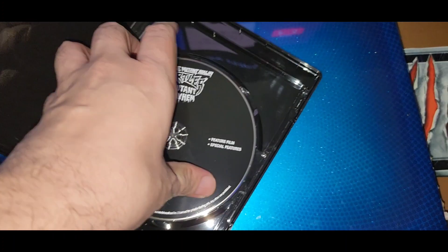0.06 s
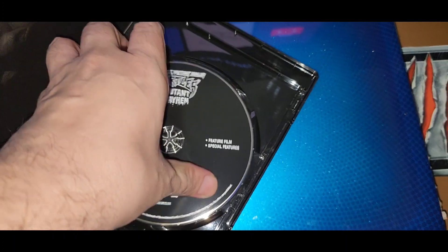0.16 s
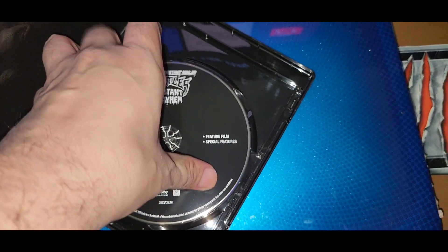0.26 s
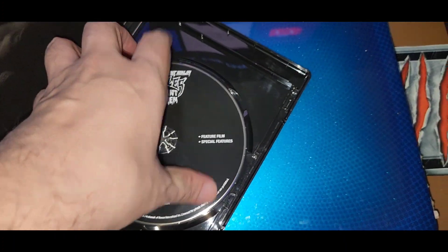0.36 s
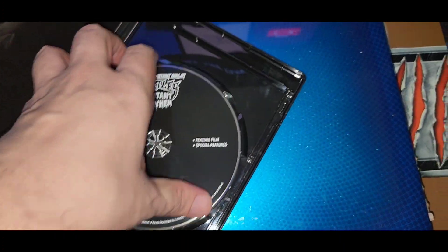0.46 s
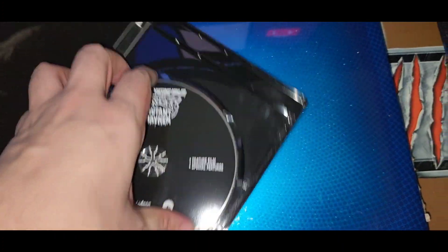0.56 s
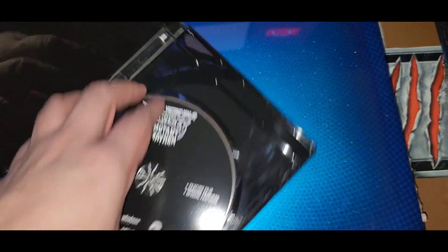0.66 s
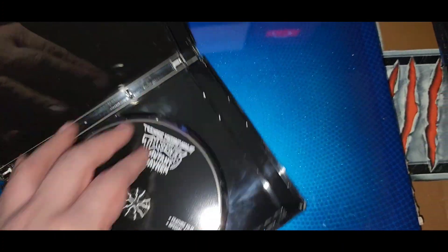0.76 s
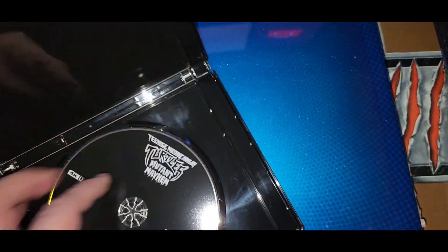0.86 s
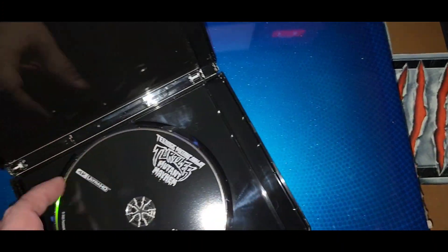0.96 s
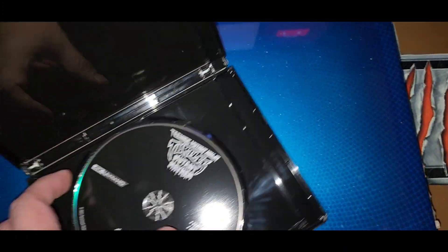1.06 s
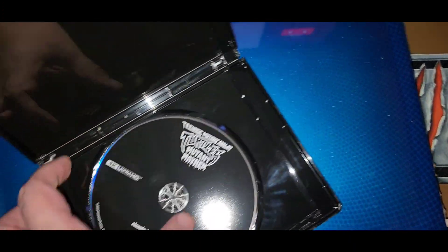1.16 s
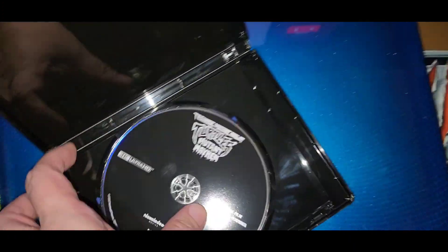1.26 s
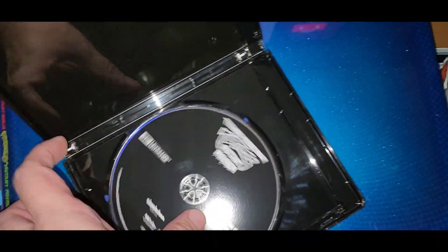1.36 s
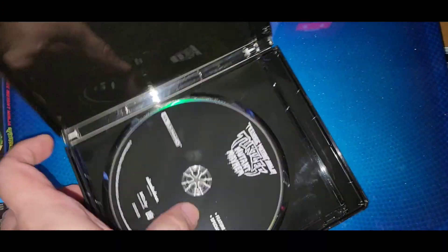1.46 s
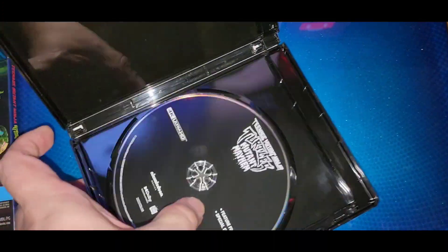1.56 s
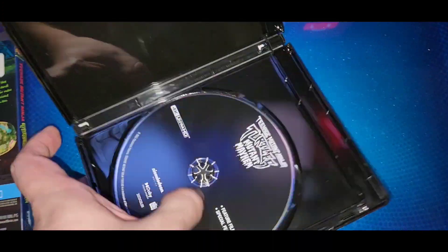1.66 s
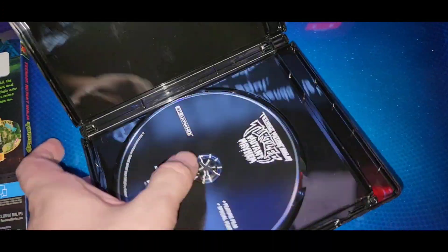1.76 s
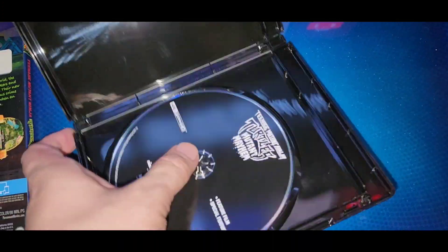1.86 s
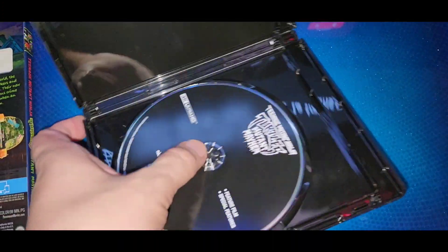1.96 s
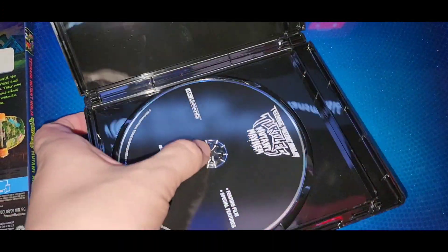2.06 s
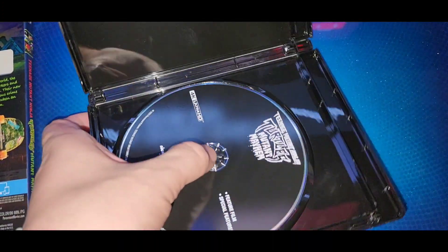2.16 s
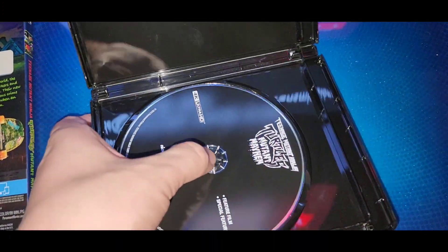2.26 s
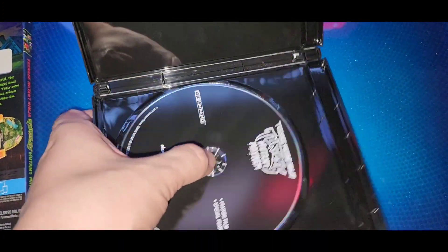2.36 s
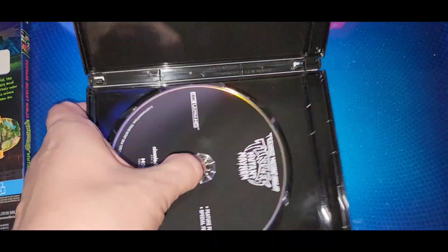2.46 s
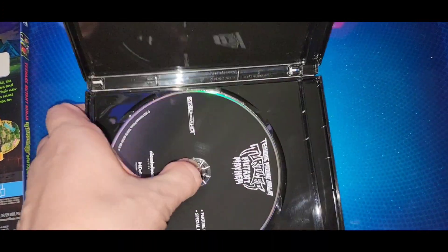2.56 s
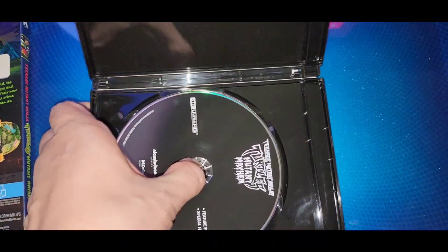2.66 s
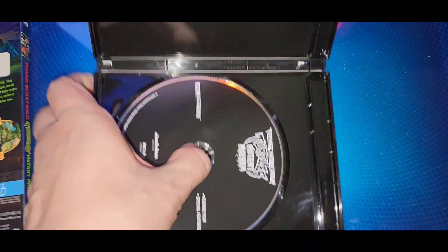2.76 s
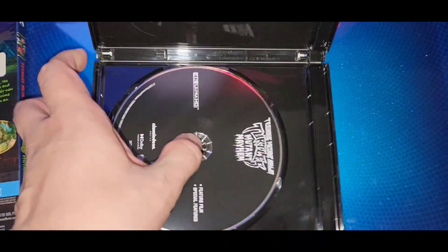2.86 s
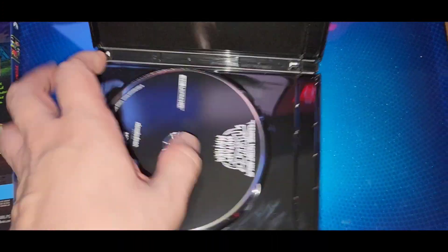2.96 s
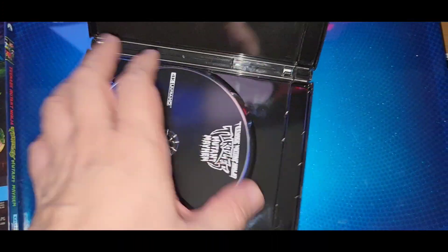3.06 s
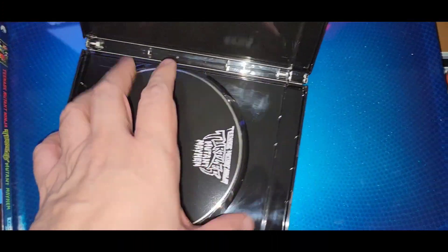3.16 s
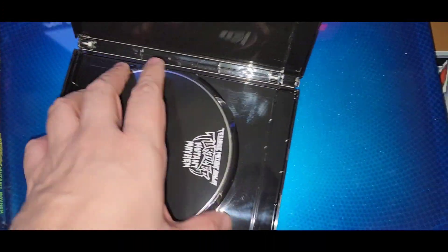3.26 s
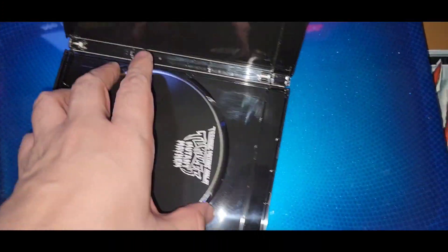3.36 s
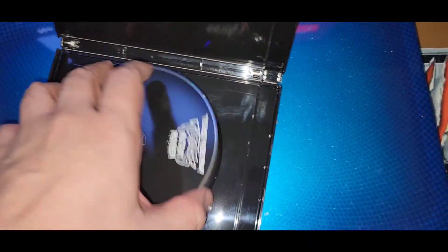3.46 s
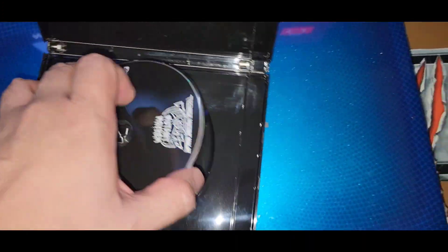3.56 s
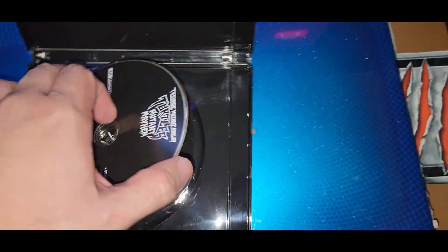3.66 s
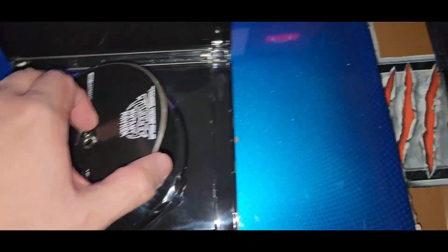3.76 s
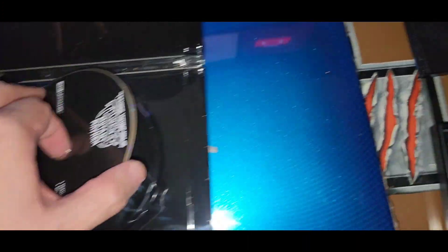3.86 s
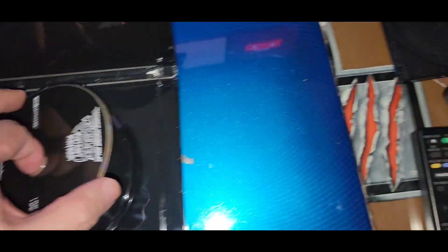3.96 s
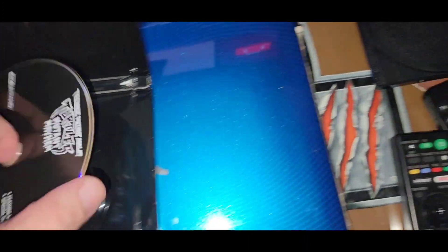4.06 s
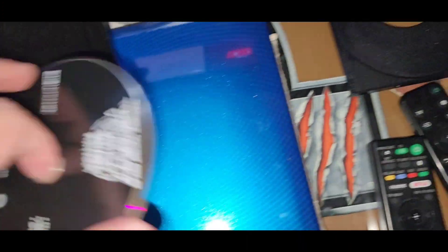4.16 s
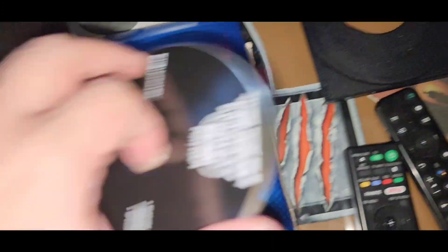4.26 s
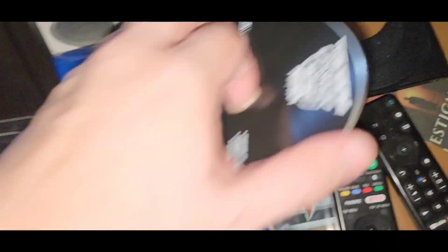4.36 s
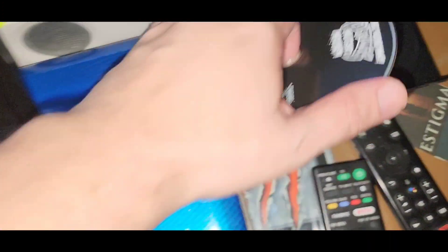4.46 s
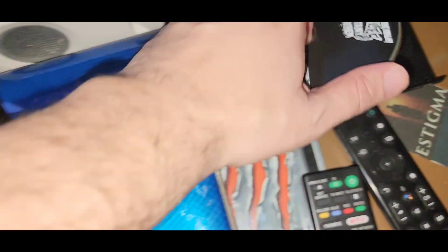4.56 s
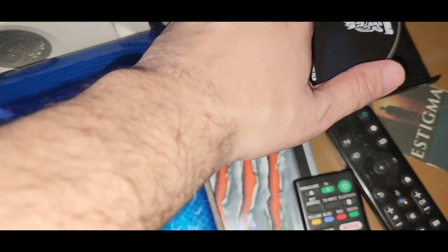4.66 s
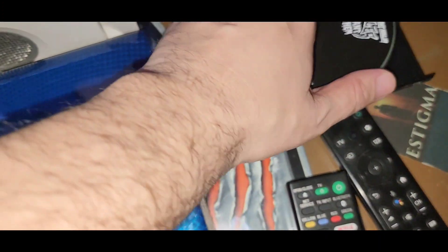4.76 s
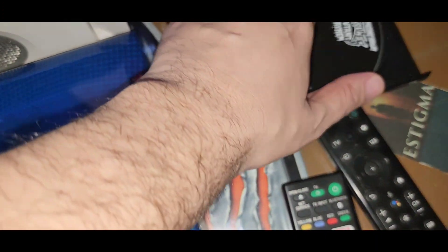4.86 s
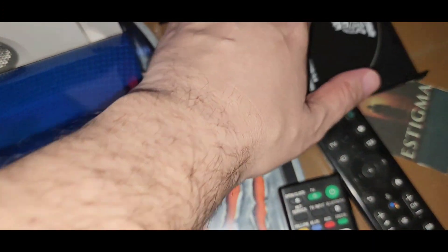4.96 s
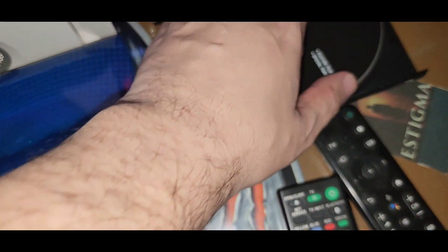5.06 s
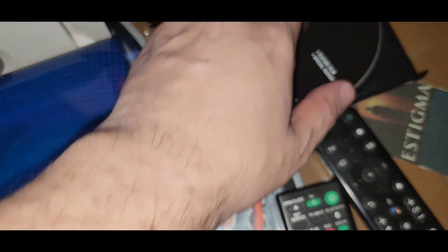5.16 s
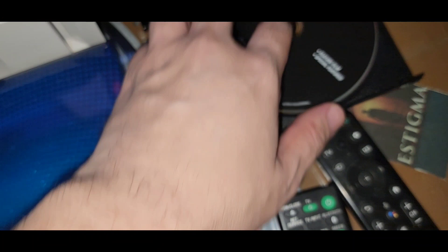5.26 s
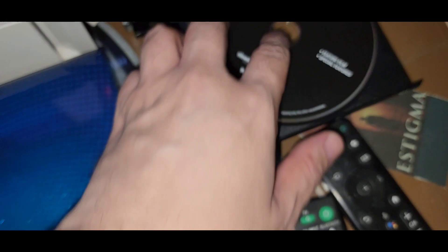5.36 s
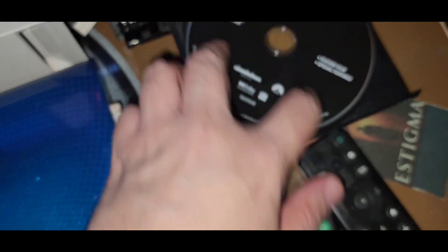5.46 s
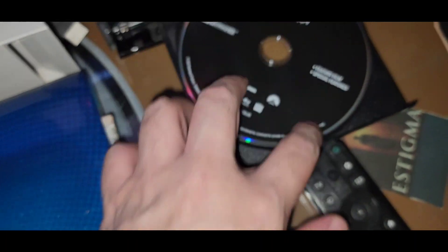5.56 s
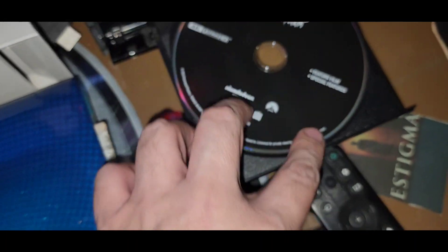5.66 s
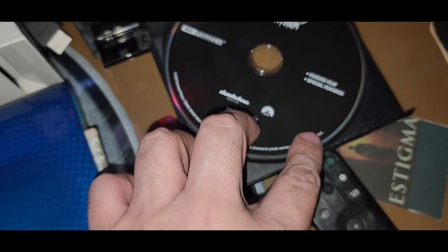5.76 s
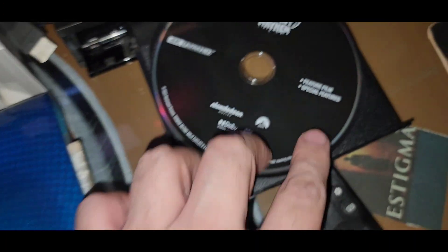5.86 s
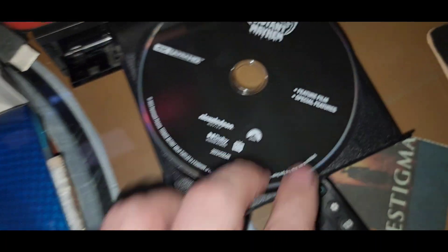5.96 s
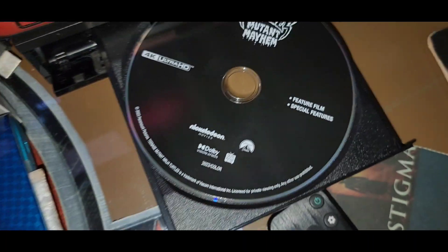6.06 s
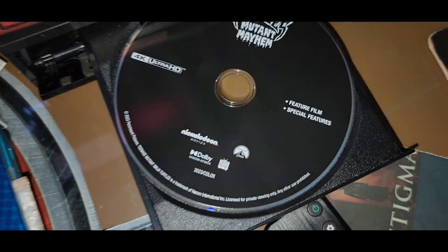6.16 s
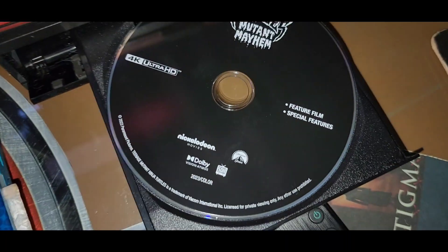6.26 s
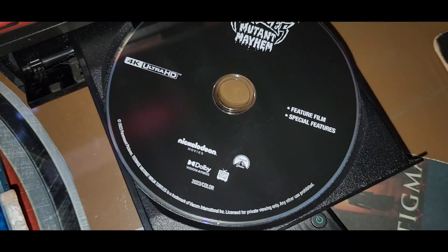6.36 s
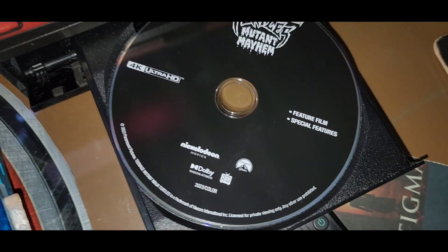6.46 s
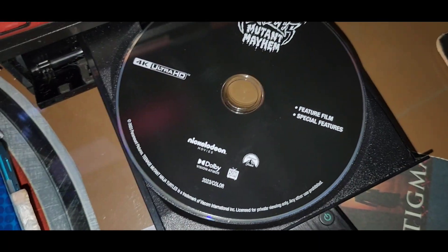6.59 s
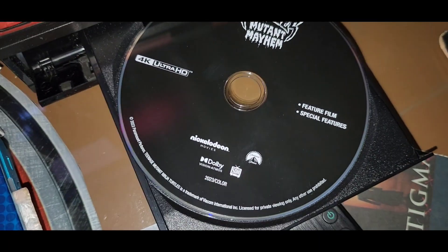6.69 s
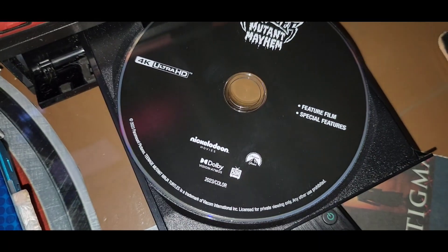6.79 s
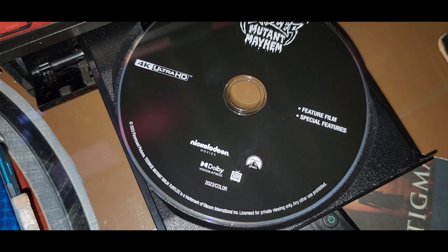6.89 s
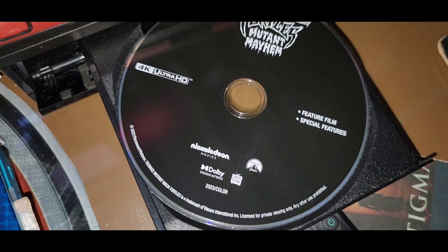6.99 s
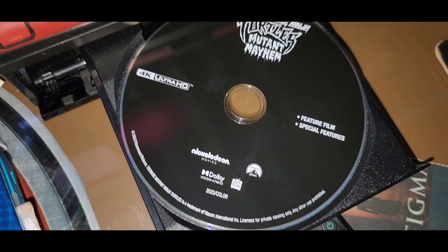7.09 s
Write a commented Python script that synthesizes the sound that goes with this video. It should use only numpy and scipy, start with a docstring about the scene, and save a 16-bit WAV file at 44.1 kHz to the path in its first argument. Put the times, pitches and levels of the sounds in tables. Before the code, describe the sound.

Fingers rub and tick on a thin plastic case, the hub pops loudly, and the disc skids and drops into a tray.

```python
"""A small, quiet room with a low rumble: close to a stereo microphone, a hand works a disc off the hub of its case.
Plastic contacts are cracks, flexing noise and ringing plates; fingers rub as noisy slips and catches; the case bumps
the desk as decaying low sines under a dull knock. The hub lets go with a loud snap. The disc is then laid in the
open tray of a player: it clatters, skids in two layers of noise and drops into its seat while the tray wobbles in
two low modes. A few faint ticks ring out; near the end come a whisk of bright noise and a squeak of one gliding sine."""
import sys
import numpy as np
from scipy import signal
from scipy.fft import rfft, irfft, next_fast_len
from scipy.io import wavfile
from scipy.ndimage import map_coordinates

SR = 44100
rng = np.random.default_rng(int(sys.argv[2]) if len(sys.argv) > 2 else 0)


def master_out(mix):
    """Clip the mix to full scale and print it as 16-bit PCM to the path in sys.argv[1]."""
    frames = np.transpose(np.atleast_2d(mix))
    ceiling = np.clip(frames, -1, 1)
    pcm = np.round(ceiling * 32767).astype(np.int16)
    wavfile.write(sys.argv[1], SR, pcm)


N = 314244


def amp(db):
    """Decibels to gain."""
    return 10 ** (np.asarray(db) / 20)


def unit(x):
    """x at rms 1."""
    return x / np.sqrt(np.mean(x ** 2) + 1e-20)


def along(points, hz):
    """Read a curve of (Hz, value) points on a log frequency axis."""
    f, v = np.transpose(points)
    return np.interp(np.log(hz + 1), np.log(f + 1), v)


def filtered(x, response):
    """x times a response of frequency."""
    n = x.shape[-1]
    m = next_fast_len(n + SR // 8)
    return irfft(rfft(x, m) * response(np.fft.rfftfreq(m, 1 / SR)), m)[..., :n]


def causal(x, gain_db, size=4096):
    """Colour x with a minimum-phase filter, so that nothing sounds before a blow."""
    log_gain = gain_db(np.fft.rfftfreq(size, 1 / SR)) * np.log(10) / 20
    cepstrum = irfft(log_gain)
    # folding the cepstrum onto positive time makes the filter minimum-phase
    cepstrum[1:size // 2] *= 2
    cepstrum[size // 2 + 1:] = 0
    impulse = irfft(np.exp(rfft(cepstrum)))
    return signal.fftconvolve(x, impulse[None], axes=1)[:, :x.shape[1]]


def add(track, s, sound):
    """Mix a sound into the track from time s."""
    part = track[:, max(round(s * SR), 0):][:, :sound.shape[-1]]
    part += sound[..., :part.shape[1]]


def wobble(n, rate):
    """A smooth random curve of n samples, rate knots a second."""
    return map_coordinates(rng.standard_normal(int(n * rate / SR) + 4), [np.arange(n) * rate / SR])


def pair(n, alike, lead_ms, shared_hz=600):
    """White noise at two ports: long waves reach both alike, short ones only partly; the left leads by lead_ms."""
    hz = np.fft.rfftfreq(n, 1 / SR)
    noise = rfft(rng.standard_normal((3, n)))
    own = np.clip(1 - alike, 0, 1) * hz ** 2 / (hz ** 2 + shared_hz ** 2)
    ports = np.sqrt(1 - own) * noise[0] + np.sqrt(own) * noise[1:]
    lead = np.pi * hz * lead_ms / 1000 * np.array([[1], [-1]])
    return irfft(ports * np.exp(1j * lead), n)


def dying(noise, t60, attack=0.0029):
    """Noise with a quick start and an exponential decay, mean energy 1 a channel."""
    t = np.arange(noise.shape[1]) / SR
    burst = noise * 10 ** (-3 * t / t60) * (1 - np.exp(-t / attack))
    return unit(burst) / np.sqrt(len(t))


def plastic(hz, knock_db, snap_db, fizz_db):
    """Spectrum of a contact in dB: thin plastic radiates little bass, and hard edges add treble."""
    knock = [(50, knock_db - 28), (230, knock_db - 6.5), (390, knock_db + 0.6), (650, knock_db - 3.5)]
    middle = [(1250, -0.5), (1650, -6), (2700, 2 + snap_db / 4)]
    snap = [(3900, snap_db + 2.5), (7200, snap_db - 1)]
    fizz = [(8400, fizz_db + 7.5), (11000, fizz_db + 2), (15500, fizz_db - 2)]
    return along(knock + middle + snap + fizz, hz)


def plate(modes, hz):
    """Gain in dB of a plate whose main modes stand out of a bed of dense weak ones."""
    power = sum(amp(db) ** 2 / (1 + (2 * (hz - f) / width) ** 2) for f, width, db in modes)
    return 10 * np.log10(1 + power)


def hump(hz, centre_hz, octaves):
    """Shape of one resonance: 1 at its centre, 0 far from it."""
    return 1 / (1 + np.abs(np.log2((hz + 1) / centre_hz) / octaves) ** 3)


def touch_point(hz, depth_db, spacing_hz=110):
    """Every point of contact favours other modes: a random ripple in dB over frequency."""
    ripple = depth_db * map_coordinates(rng.standard_normal(SR // 20), [hz / spacing_hz], mode="wrap")
    return ripple - 10 * np.log10(np.mean(amp(ripple) ** 2))  # mean power gain 1


def bending(n, lead_ms, spread_s, apart, step_hz=500):
    """A crack of energy about 1: bending waves of each pitch leave the plate at their own moment."""
    hz = np.fft.rfftfreq(n, 1 / SR)
    late, split = (map_coordinates(rng.standard_normal(SR // 20), [hz / step_hz], mode="wrap")
                   for _ in range(2))
    delay_s = spread_s * (np.abs(late) + .25)
    phase = -2 * np.pi * np.cumsum(delay_s) * SR / n
    # the two ports hear different phases, more so in the treble
    port_phase = np.pi * hz * lead_ms / 1000 + apart * split * hz / (hz + 2 * step_hz)
    ports = port_phase * np.array([[1], [-1]])
    return irfft(np.exp(1j * (phase + ports)), n) * (np.arange(n) < n // 4)


PIVOT_HZ = 2500  # soft contacts that ring below this gain knock, those above it lose knock
KNOCK_PER_OCTAVE = 0.48  # dB of knock per octave under the pivot, for each dB of edge lost
CLICK_FIZZ_GROWS = 1.7  # dB of top treble per dB of edge
SOFT_DAMPS = 0.17  # dB of ring lost per dB of edge lost: a soft touch also damps the plate
CHATTER_DB, CHATTER_RATE = 3, 510  # the loose disc buzzes on the plastic: depth, random knots a second


def clicks(rows, modes, lead_ms=.15, spread_s=.0012, flex_t60=0.038, ring_t60=0.092,
           crack_db=-4, flex_db=-5, ring_db=-8.5, peak_db=6, peak_octaves=0.2, ripple_db=4.0,
           softness=0.067, knock_db=-4.5, fizz_db=-6):
    """Contacts: a crack, the quick flexing of the plastic around it, and the ring of the plates."""
    out, n = np.zeros((2, N)), SR // 5
    for s, db, edge_db, main_hz in rows:
        crack = amp(crack_db) * bending(n, lead_ms, spread_s, apart=0.91)
        chatter = amp(CHATTER_DB * wobble(n, CHATTER_RATE))
        flex = amp(flex_db) * dying(pair(n, 0.28, lead_ms) * chatter, flex_t60)
        ringing = filtered(pair(n, 0.068, lead_ms),
                           lambda hz: amp(plate(modes, hz) + touch_point(hz, ripple_db)))
        ring = amp(ring_db + SOFT_DAMPS * edge_db) * dying(ringing, ring_t60)
        # a hard edge fills every band; with softness set, a soft one gathers around its main resonance
        knock = knock_db + KNOCK_PER_OCTAVE * edge_db * np.log2(main_hz / PIVOT_HZ)
        fizz = fizz_db + CLICK_FIZZ_GROWS * edge_db
        main = lambda hz: (peak_db - softness * edge_db) * hump(hz, main_hz, peak_octaves)
        colour = lambda hz: (plastic(hz, knock, edge_db, fizz) + main(hz)
                             + touch_point(hz, ripple_db / 2, spacing_hz=263.0))
        add(out, s, amp(db) * causal(crack + flex + ring, colour))
    return out


def thuds(rows, t60, level_db, overtone, overtone_db, puff_db, attack=0.0037):
    """A soft push swings a whole body in its lowest two modes, with a dull knock around them."""
    out, t = np.zeros((2, N)), np.arange(SR // 3) / SR
    for s, db, hz in rows:
        upper_hz = hz * overtone * rng.uniform(.93, 1.07)
        swing = np.sin(2 * np.pi * hz * t) + amp(overtone_db) * np.sin(2 * np.pi * upper_hz * t)
        knock = unit(filtered(pair(len(t), 0.43, 0), lambda f: (f / hz) ** 2 / (1 + (f / hz) ** 4)))
        fade = 10 ** (-3 * t / t60)
        body = swing + amp(puff_db) * fade * knock  # the knock dies twice as fast as the swing
        add(out, s, amp(db + level_db) * fade * (1 - np.exp(-t / attack)) * body)
    return out


# Spectrum of the still room. Each row: frequency in Hz, relative density in dB per Hz.
ROOM_SPECTRUM = [(15, -28), (30, -6), (56, -5), (95, -13.5), (150, -17.5), (280, -31.5), (600, -37.5),
                 (3500, -44.5), (7700, -49), (9500, -60.5)]


def room_tone(level_db=-62.5, swell_db=3):
    """A randomly swelling rumble that both ports share, under a faint hiss that they mostly do not."""
    shared = [(100, .93), (400, 0.41), (6000, 0.11)]  # (Hz, likeness of the ports)
    turn = lambda hz: np.arccos(np.clip(along(shared, hz), 0, 1)) / 2
    balance = lambda hz: np.array([np.ones_like(hz), np.tan(turn(hz))])
    mid, side = filtered(rng.standard_normal((2, N)),
                         lambda hz: amp(along(ROOM_SPECTRUM, hz)) * balance(hz))
    tone = unit(np.array([mid + side, mid - side]))
    rumble = filtered(tone, lambda hz: 1 / (1 + (hz / 200) ** 4))
    return amp(level_db) * (tone + rumble * (amp(swell_db * wobble(N, 19.0)) - 1))


def room(x, t60=0.23):
    """The walls of a small, furnished room: a noise tail that builds in milliseconds and dies quickly."""
    return signal.fftconvolve(x, dying(rng.standard_normal((2, SR // 2)), t60), axes=1)[:, :N]


def squeak(start_s=7.04, length_s=0.08, top_hz=1730, droop_hz=130, level_db=-75):
    """A faint, thin squeak: one sine whose pitch rises and falls in an arch."""
    out, arch = np.zeros((2, N)), np.sin(np.linspace(0, np.pi, round(length_s * SR)))
    phase = 2 * np.pi * np.cumsum(top_hz - droop_hz * (1 - arch)) / SR
    add(out, start_s, amp(level_db) * np.sqrt(np.abs(arch)) * np.sin(phase))
    return out


def whisk(peak_s=6.745, rise_s=0.055, fall_s=0.028, level_db=-67):
    """A thin, bright hiss of coloured noise swells slowly and fades fast."""
    t = np.arange(N) / SR - peak_s
    bell = np.exp(-(t / np.where(t < 0, rise_s, fall_s)) ** 2 / 2)
    swell = bell * amp(2.7 * wobble(N, 160))
    colour = [(1500, -41), (3500, -5), (5600, 4), (7800, 2.5), (9000, -9), (15500, -10)]  # (Hz, dB)
    hiss = filtered(pair(N, 0.31, 0), lambda hz: amp(along(colour, hz) + touch_point(hz, 2.1)))
    return amp(level_db) * swell * unit(hiss)


# The case bumps on the desk. Each row: start in seconds, relative level in dB, pitch in Hz.
DESK_BUMPS = [(0.32, -48, 113), (1.5, -35.5, 78), (2.633, -41.5, 127.5), (2.989, -42.5, 82.6),
              (3.256, -46.5, 86), (4.168, -60.5, 147), (4.669, -55, 123.5)]


def desk_bumps():
    """The case meets the desk and the whole body swings in two low modes with a dull knock."""
    return thuds(DESK_BUMPS, t60=0.1, level_db=5.5, overtone=1.7, overtone_db=-7.5, puff_db=0.0)


# The tray stiffens as the hand presses down and slackens as it lets go.
# Each row: time in seconds, pitch of the wobble in Hz, level in dB.
TRAY_STIFFNESS = [(4.93, 244.5, -49.5), (5.54, 302.3, -54), (5.67, 237, -51.5), (5.851, 174, -58)]


def tray_wobbles(lag_s=0.0041):
    """Each tray contact and the first seating clack set the tray wobbling on its rails, in two close modes."""
    times, hz, db = np.transpose(TRAY_STIFFNESS)
    rows = [(s + lag_s, np.interp(s, times, db), np.interp(s, times, hz))
            for s, *_ in TRAY_CONTACTS + SEATING_CLACKS[:1]]
    return thuds(rows, t60=0.21, level_db=0, overtone=1.1, overtone_db=-1.5, puff_db=-1.0)


RUB_PEAK_DB, RUB_SINK_OCTAVES = 7.5, 0.33  # height of a rub's resonance, its fall either side of the middle


def sinking(x, n, main_hz, octaves=0.15):
    """A resonance that glides down through main_hz during the first n samples of x."""
    progress = np.clip(2 * np.arange(x.shape[1]) / n - 1, -1, 1)
    centre = lambda stage: main_hz * 2 ** (-stage * RUB_SINK_OCTAVES)
    at = lambda stage: causal(x, lambda hz: RUB_PEAK_DB * hump(hz, centre(stage), octaves))
    # crossfade through three fixed resonances: high, middle, low
    return sum(np.maximum(1 - np.abs(progress - stage), 0) * at(stage) for stage in (-1, 0, 1))


LIFT_S = 4.2  # before this the disc is in the case, afterwards over the tray
RUB_FIZZ_GROWS = 1.6  # dB of top treble per dB of edge
RUB_KNOCK_GROWS = 0.29  # dB of knock per dB of edge lost: a heavy rub moves the whole shell
RUB_RING = 0.22  # share of the plastic's resonance, in dB, left under a sliding finger
# Fingers and plastic sliding. Each row: start in seconds, end in seconds, relative level in dB,
# edge in dB (low for a heavy, dull touch), main resonance in Hz.
SLIDES = [(0.395, 0.457, -45, -3, 2330), (0.542, 0.891, -60, 6, 1400), (0.996, 1.109, -40.5, -8.5, 1380),
          (1.103, 1.531, -58.5, -7.5, 1230), (1.199, 1.278, -45.5, -9, 1150),
          (1.85, 1.963, -47, -10.5, 555), (1.991, 2.086, -46, -4.5, 1390), (2.162, 2.257, -56.5, -9, 2990),
          (2.803, 2.915, -51.5, -10.5, 750), (2.963, 3.09, -52.5, -4.5, 1010),
          (3.242, 3.322, -49.5, -1, 1040), (3.37, 3.401, -43, -3, 1700), (3.57, 3.614, -59.5, 2, 4000),
          (3.845, 3.902, -42, -8, 2010), (3.95, 4.014, -46, -12, 1090), (4.743, 4.837, -47.5, -10.5, 1250),
          (4.949, 5.067, -42.5, -10.5, 1300)]


def rubs(level_db=-4, grain_db=3.0, catch_rate=80, catch_size=0.74, catch_s=0.0017,
         ripple_db=4, knock_db=1.5, fizz_db=-10):
    """Sliding contact: a fine grain of slips, and sudden catches that grow as the touch gets heavier and duller."""
    out = np.zeros((2, N))
    for start, end, db, edge_db, main_hz in SLIDES:
        n = round(max(end - start, .01) * SR)
        hits = rng.random(n) < catch_rate / SR
        catches = hits * (.5 + rng.random(n)) * catch_size * amp(-edge_db)
        released = signal.lfilter([1], [1, -np.exp(-1 / (catch_s * SR))], catches)
        slips = unit(amp(grain_db * wobble(n, 900)) + released)
        uneven = unit(amp(2.5 * wobble(n, 18.6)))  # the hand presses unevenly
        pressure = np.sin(np.linspace(0, np.pi, n)) * uneven
        stroke = np.pad(pressure * slips * pair(n, 0.25, .15), [(0, 0), (0, SR // 20)])
        knock, fizz = knock_db - RUB_KNOCK_GROWS * edge_db, fizz_db + RUB_FIZZ_GROWS * edge_db
        modes = CASE_RING if start < LIFT_S else TRAY_RING
        colour = lambda hz: (plastic(hz, knock, edge_db, fizz) + RUB_RING * plate(modes, hz)
                             + touch_point(hz, ripple_db))
        add(out, start, amp(db + level_db) * sinking(causal(stroke, colour), n, main_hz))
    return out


# The rim of the disc skids over the tray.
# Each row: time in seconds, level of the hollow body in dB, level of the rasp in dB.
RIM_SKID = [(5.056, -67, -72), (5.079, -49, -51.5), (5.103, -49.5, -48), (5.131, -49, -64),
            (5.17, -74, -98)]


def skid(slip_rate=420, slip_db=1.0):
    """The rim sticks and slips on the tray: its hollow body drones on after the rasp has faded."""
    times, body_db, rasp_db = np.transpose(RIM_SKID)
    t = np.arange(times[0], times[-1], 1 / SR)
    slips = amp(slip_db * wobble(len(t), slip_rate))
    hollow = [(200, -4), (510, -15.5), (740, 1.5), (1100, -5.5), (1600, -9.5), (3000, -47)]  # (Hz, dB)
    body = lambda hz: along(hollow, hz)
    rasp = lambda hz: plastic(hz, -12.5, -5.0, -20) + plate(DISC_RING, hz) / 2
    level = lambda db: amp(np.interp(t, times, db))
    layer = lambda colour, db: level(db) * unit(causal(slips * pair(len(t), 0.53, 0), colour))
    out = np.zeros((2, N))
    add(out, times[0], layer(body, body_db) + layer(rasp, rasp_db))
    return out


# Faint ringing ticks, one before and two after the dry clack of the disc dropping into its seat, one side
# after the other. Each row: start in seconds, relative level in dB, edge in dB, main resonance in Hz.
FAINT_TICKS = [(4.111, -31.5, -20, 936), (6.42, -35, 5, 12100), (6.908, -37.5, 0, 5260)]
SEATING_CLACKS = [(5.5363, -8, -11.5, 1270), (5.5398, -4.5, -13, 1206)]


def seating_and_ticks():
    """Seating clacks and faint ticks: strongly peaked contacts with little flexing."""
    return clicks(SEATING_CLACKS + FAINT_TICKS, TRAY_RING, lead_ms=0, ring_t60=0.089, flex_db=-9.5,
                  peak_db=7.5, peak_octaves=0.26, softness=0.39, knock_db=-7, fizz_db=-3.5)


# What disc and tray ring with. Each row: frequency in Hz, width in Hz, height in dB.
TRAY_RING = [(720, 45, 19.5), (930, 71, 9), (1050, 140, 8.5), (1578, 120, 15.5)]
# Contacts of disc and tray. Each row: start in seconds, relative level in dB, edge in dB, main resonance in Hz.
TRAY_CONTACTS = [(4.9316, -6, -5, 2750), (4.987, -7.5, -4, 1120), (5.097, -10.5, -2.5, 900),
                 (5.192, -19.5, -8.5, 1150), (5.308, -43, -14, 690), (5.4736, -26, -15, 910),
                 (5.662, -35, -15, 1070), (5.826, -49, -14, 590)]


def tray_contacts():
    """The disc clatters in the tray: short flexing, a strong ring, and soft touches gathered in one peak."""
    return clicks(TRAY_CONTACTS, TRAY_RING, lead_ms=0, spread_s=.0018, flex_t60=0.016,
                  ring_db=-1.5, peak_db=3.0, softness=0.68, knock_db=-8.0, fizz_db=-4)


# The fingers shift their grip on the case. Each row: start in seconds, end in seconds.
GRIP_SHIFTS = [(0.62, 0.84), (1.09, 1.41), (2.82, 3.07), (3.13, 3.32)]


def fidgets(count=20, level_db=-31.5, scatter_db=5, edge_db=-8, lowest_hz=600, octaves=2.8):
    """Faint contacts scattered through each change of grip; under the fingers their flexing dies at once."""
    rows = []
    for start, end in GRIP_SHIFTS:
        for k, (when, size, pitch) in enumerate(rng.random((count, 3))):
            s = start + (k + when) / count * (end - start)
            db = level_db + scatter_db * (2 * size - 1)
            rows.append((s, db, edge_db, lowest_hz * 2 ** (octaves * pitch)))
    return clicks(rows, CASE_RING, flex_t60=.021, peak_db=6, peak_octaves=.5)


# What disc and case ring with. Each row: frequency in Hz, width in Hz, height in dB.
CASE_RING = [(413.4, 50, 5.5), (566, 76, 6.5), (1400, 190, 6), (2100, 140, 10.5), (2470, 49, 6),
             (4480, 110, 8.5), (7370, 220, 9.5)]
# Contacts of disc and case. Each row: start in seconds, relative level in dB,
# edge in dB (high for a hard corner, low for a soft touch), main resonance in Hz.
CASE_CONTACTS = [(0.1907, -8, -23, 7300), (0.1928, 11, -4, 2200), (0.2016, 3, -6.5, 2650),
                 (0.3236, -2, -3.5, 5330), (0.3255, -12.5, -11, 470), (0.3898, -6.5, -6, 533),
                 (0.5946, -11.5, -7.5, 2510), (0.6116, -12.5, -10.5, 517), (0.777, -20, -14, 650),
                 (1.012, -7.5, -12.5, 738), (1.06, -16, -10.5, 727), (1.0849, -16.5, -7, 1680),
                 (1.2648, -13.5, -15.5, 665), (1.3269, -34, 0, 6600), (1.5012, -0.5, -9, 485),
                 (1.7544, -22, -11.5, 1920), (1.8941, -22, -13.5, 559), (1.934, -25, -8, 5780),
                 (2.5506, -18.5, -8, 1210), (2.7103, -13.5, -6, 1390), (2.8059, -17, -13.5, 590),
                 (2.8256, -14.5, -10.5, 660), (2.8708, -18, -10, 2580), (2.989, -16.5, -18.5, 1960),
                 (3.011, -14, -37, 1640), (3.019, -8, -12, 540), (3.04, -18.5, -8.5, 604),
                 (3.0761, -12.5, -12, 1100), (3.1381, -19.5, -5.5, 2920), (3.1595, -7.5, -14, 3430),
                 (3.2452, -6.5, 0, 5000), (3.2872, -17.5, -5.5, 465), (3.3935, -10.5, -1.5, 4680),
                 (3.5626, -30, -15.5, 640), (3.682, -12.5, -9.5, 730), (3.873, -14.5, -7.5, 2050),
                 (3.9235, -31, -18.5, 576), (3.9855, -19, -20, 1520)]


def case_contacts():
    """The case ticks as the hand works the disc: each contact cracks, flexes and rings its plates."""
    return clicks(CASE_CONTACTS, CASE_RING)


# What the freed disc rings with. Each row: frequency in Hz, width in Hz, height in dB.
DISC_RING = [(560, 85, 16), (2140, 170, 12.5), (2492, 120, 3.5), (3030, 80, 3)]
# The hub lets go of the disc and springs back; the first row is a weak, dull tick just before.
# Each row: start in seconds, relative level in dB, edge in dB, main resonance in Hz.
HUB_RELEASE = [(2.6208, -8, -17.5, 2274), (2.6336, 16.5, -13.5, 2407), (2.6357, 7, -11.5, 3039)]


def hub_snap():
    """The hub lets go in a strong, compact crack; the thumb still presses on the disc, so it rings less."""
    return clicks(HUB_RELEASE, DISC_RING, lead_ms=0.098, spread_s=0.00055, flex_t60=0.025, ring_t60=0.1,
                  crack_db=-0.33, flex_db=-7.5, ring_db=-15, peak_db=2.5, peak_octaves=.3,
                  softness=0, knock_db=-7.0, fizz_db=-14.0)


def scene():
    """Case, tray and fingers in the room."""
    faint = squeak() + whisk()
    low = desk_bumps() + tray_wobbles()
    sliding = rubs() + skid()
    contacts = seating_and_ticks() + tray_contacts() + fidgets() + case_contacts() + hub_snap()
    near = faint + low + sliding + contacts
    return near + amp(-17.5) * room(near) + room_tone()


def record(dry):
    """The two ports differ a little in colour; a very steep slope closes the band at 16.3 kHz."""
    balance = [(200, -.5), (1290, 3), (2380, -1.5), (4400, -3.5), (12000, -1.0)]  # (Hz, left-right dB)
    coloured = filtered(dry, lambda hz: amp(along(balance, hz) * np.array([[.5], [-.5]])))
    return filtered(coloured, lambda hz: 1 / np.sqrt(1 + (hz / 16300) ** 120))


dry = scene()
out = record(dry)
master_out(out)
```